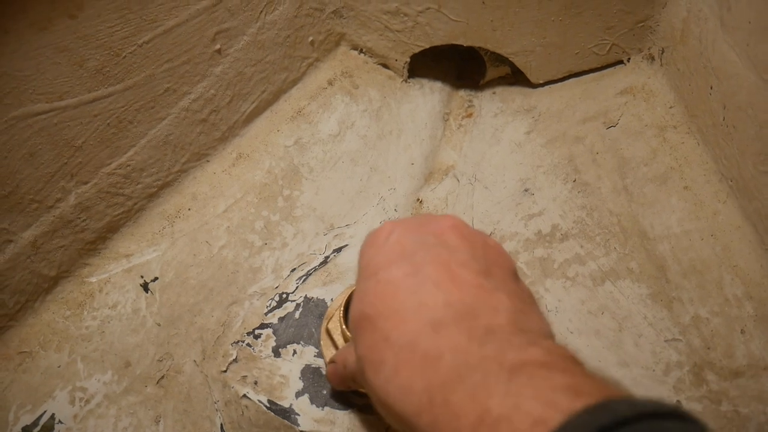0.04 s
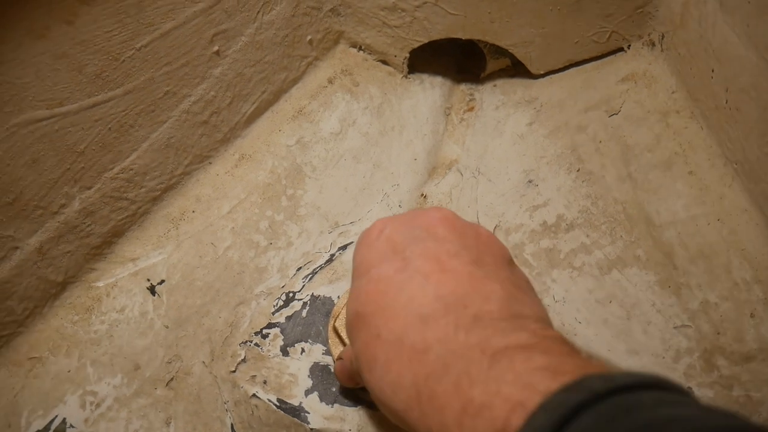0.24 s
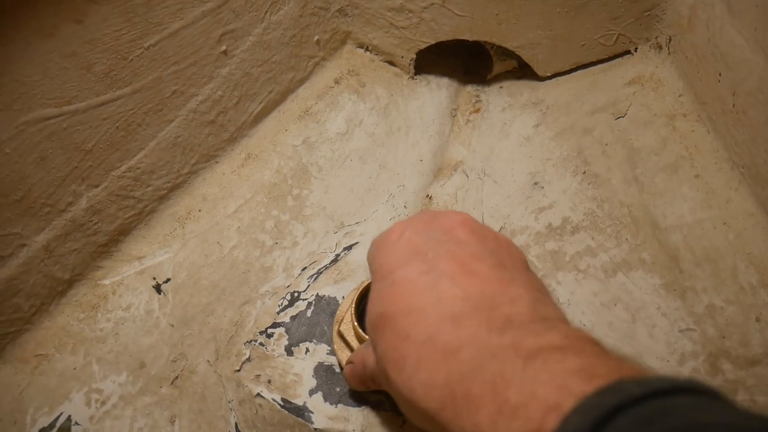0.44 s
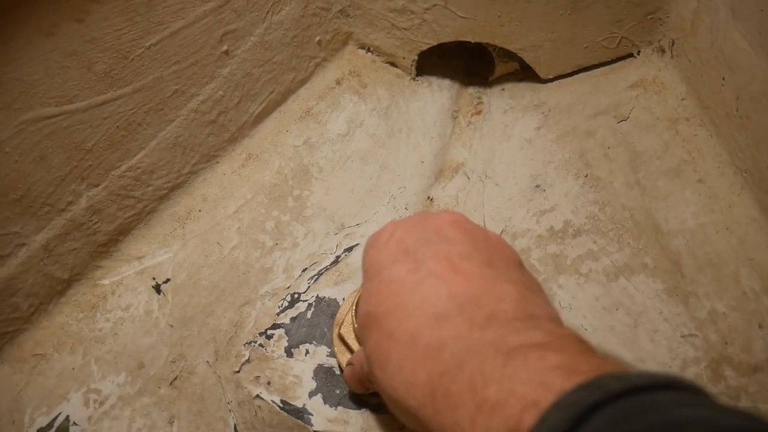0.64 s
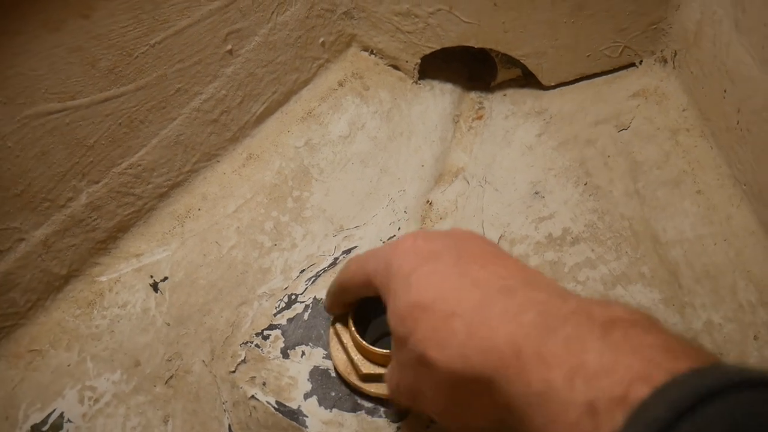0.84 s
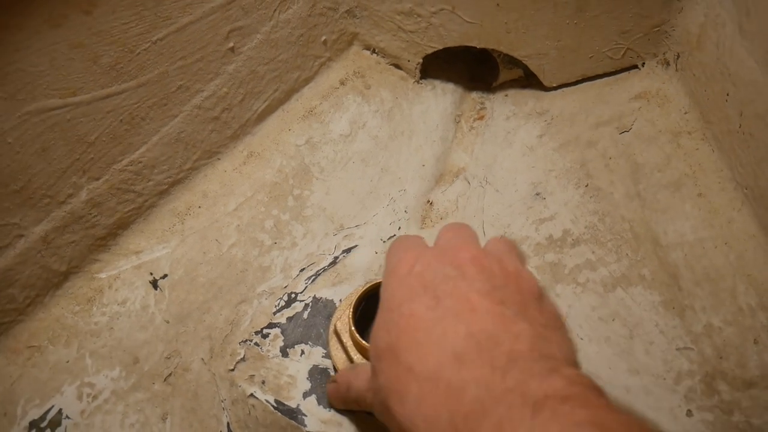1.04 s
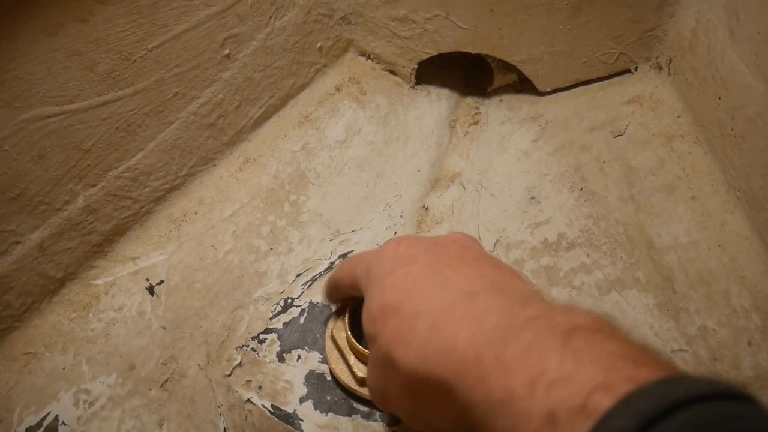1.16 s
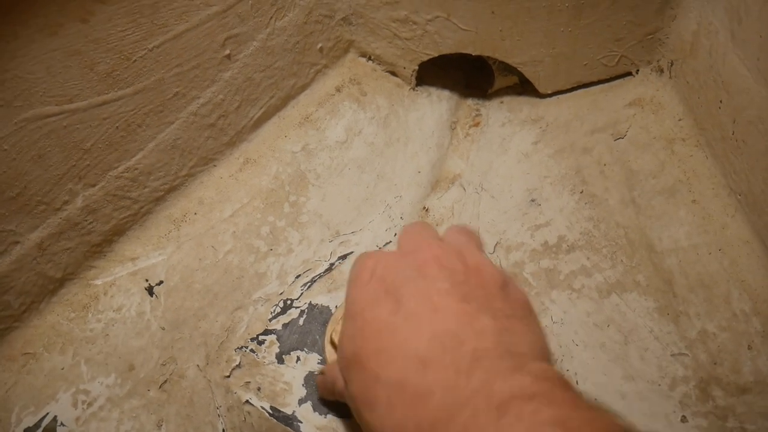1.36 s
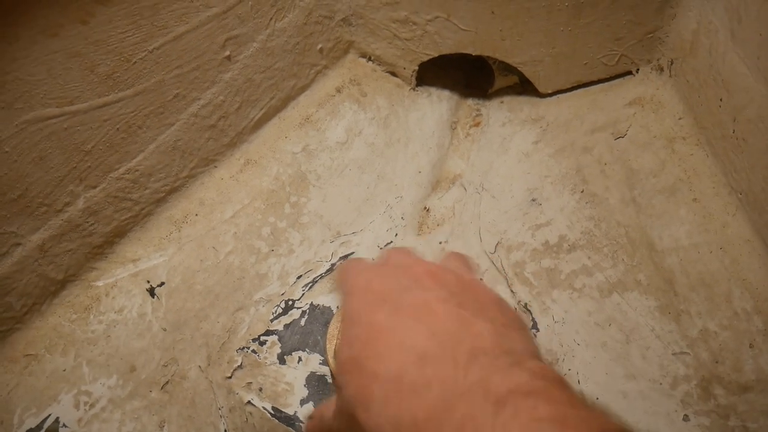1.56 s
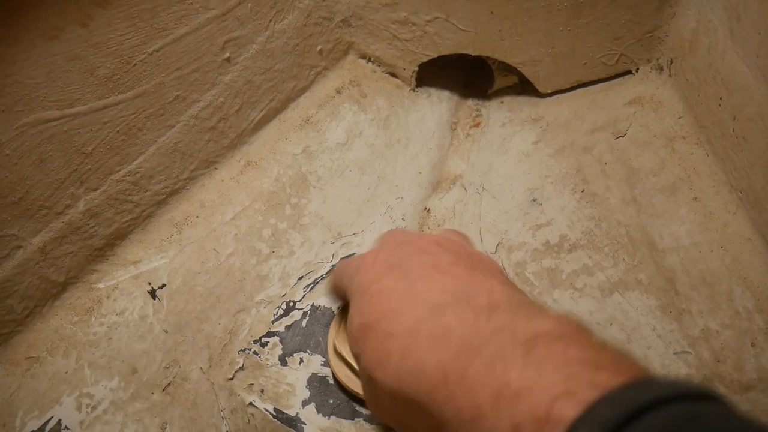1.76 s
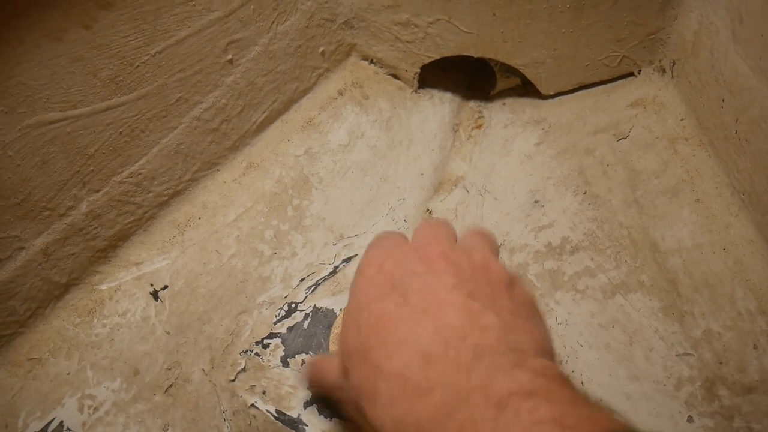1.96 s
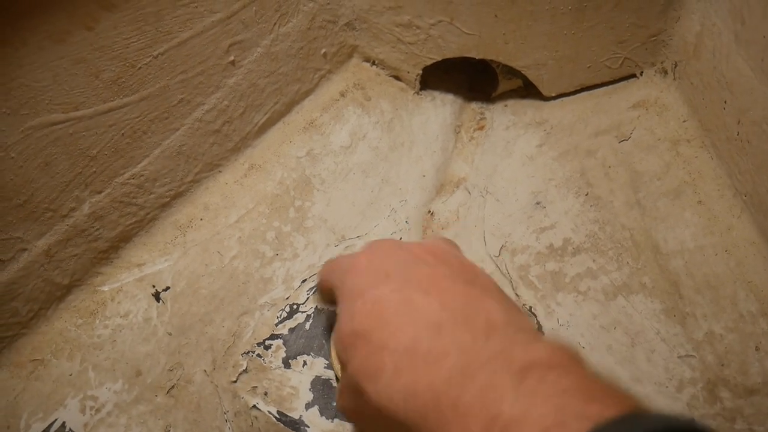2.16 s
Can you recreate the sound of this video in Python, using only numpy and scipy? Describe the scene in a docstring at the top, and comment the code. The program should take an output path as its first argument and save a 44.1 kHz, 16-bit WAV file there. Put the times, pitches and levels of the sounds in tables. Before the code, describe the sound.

A hand turns a tight metal fitting with gritty scrapes and one sharp, booming knock.

```python
"""A hand works a tight metal fitting round in its seat in a fibreglass hull, close to the microphone.
Over the quiet air the hand rubs faintly; then the fitting breaks free with one sharp knock that booms
through the hull, and bumps softly once more. The fingers regrip and turn it in short gritty rubs:
small jerks ring its hollow seat, grit ticks in the thread and the metal squeaks briefly."""
import sys
import numpy as np
from scipy import signal
from scipy.fft import rfft, irfft
from scipy.io import wavfile

SR = 44100
rng = np.random.default_rng(int(sys.argv[2]) if len(sys.argv) > 2 else 0)


def store_wav(level_fs):
    """Save 16-bit WAV to argv[1]."""
    pcm = np.round(np.clip(np.atleast_2d(level_fs), -1, 1) * 32767)
    wavfile.write(sys.argv[1], SR, pcm.T.astype(np.int16))


N = 97020
T = np.arange(N) / SR
HZ = np.fft.rfftfreq(N, 1 / SR)

# booming modes of the hull (frequency [Hz], relative level [dB], t60 [s], build-up [s])
HULL_MODES = [(75.5, -20, 0.49, 0.0052), (88, -21.5, 0.67, 0.0048), (98.6, -24, 0.47, 0.01),
              (114.4, -17, 0.35, 0.0047), (129.6, -13, 0.51, 0.0075), (144.3, -9.5, 0.34, 0.023),
              (242, -18, 0.34, 0.0037), (280, -16.5, 0.36, 0.0028), (345.4, -19.5, 0.39, 0.024),
              (405, -28.5, 0.43, 0.017)]


def amp(db):
    """Decibels to gain."""
    return 10 ** (np.asarray(db) / 20)


def unit(x):
    """Scales to rms 1."""
    return x / np.sqrt(np.mean(x ** 2) + 1e-20)


def read(points, hz):
    """Reads a table on a log-frequency axis."""
    f, value = np.transpose(points)
    return np.interp(np.log(hz + 1), np.log(f + 1), value)


def colour(x, spectrum, lift_db=0):
    """Filters x by a spectrum, at rms 1."""
    return unit(irfft(rfft(x) * amp(read(spectrum, HZ) + lift_db), N))


def noise():
    """White noise."""
    return rng.standard_normal(N)


def since(s):
    """Time since s, zero before."""
    return np.maximum(T - s, 0)


def puff(s, rise_s):
    """Envelope that peaks rise_s after s, then dies away."""
    u = since(s) / rise_s
    return u * np.exp(1 - u)


def bell(s, half_length):
    """Bell-shaped envelope centred on s."""
    return np.exp(-((T - s) / half_length) ** 2)


def ring(s, modes):
    """Damped modes of alternating sign struck at s, each with its own build-up."""
    t = since(s)
    out = np.zeros(N)
    for k, (hz, db, t60, rise) in enumerate(modes):
        envelope = amp(db - 60 * t / t60) * (1 - np.exp(-(t / rise) ** 2))
        out += (-1) ** k * envelope * np.sin(2 * np.pi * hz * t)
    return out


def air():
    """Quiet, steady air inside the hull."""
    # room tone (frequency [Hz], relative level [dB])
    spectrum = [(25, -16), (60, 0.5), (120, 3.5), (250, -1.5), (550, 1), (1000, -12), (2000, -12.5),
                (4000, -20), (8000, -24), (15500, -30)]
    return amp(-54) * colour(noise(), spectrum)


def friction(spectrum, judder_db=0):
    """Dense tiny slips of uneven size, clumped by judder, excite the seat and the metal."""
    # their resonances (frequency [Hz], width [Hz], lift [dB])
    resonances = [(446.4, 5.8, 7), (502, 37, 2), (652.6, 14, 8.5), (809, 24, 4), (1027.4, 31, 9.5),
                  (1480, 9.6, 8.5), (4950, 230, 3), (8200, 140, 4.5), (9720, 140, 5.5)]
    grains_per_s, spread_db, judder_s = 9000, 2, 0.012
    grains = noise() * (rng.random(N) < grains_per_s / SR)
    grains *= amp(spread_db * np.minimum(rng.exponential(1, N), 4))
    judder = unit(irfft(rfft(noise()) * np.exp(-(HZ * judder_s) ** 2), N))
    lift_db = sum(db / (1 + (2 * (HZ - hz) / width) ** 2) for hz, width, db in resonances)
    return colour(grains * amp(judder_db * judder), spectrum, lift_db)


def rubs():
    """Each stroke of the hand drives a juddering low rub, a scrape and a smoother hiss."""
    # the strokes (a table each), the slide into the bump and the firmest turn
    # (time [s], relative rub level [dB], relative scrape level [dB], relative hiss level [dB])
    strokes = [
        [(0.0, -57, -52, -61), (0.01, -49.5, -69, -67), (0.038, -49.5, -59, -75), (0.056, -56, -54.5, -68),
         (0.08, -50, -50.5, -61.5), (0.116, -54, -58, -62), (0.134, -65, -54, -60), (0.164, -75, -63, -62),
         (0.2, -64, -57, -55.5)],
        [(0.75, -80, -64.5, -77), (0.81, -54, -57.5, -63), (0.855, -48.5, -47, -56.5), (0.885, -48, -51, -58.5),
         (0.965, -47.5, -52.5, -58.5), (1.01, -52, -57, -56.5), (1.056, -51.5, -63, -65), (1.11, -57, -66, -67)],
        [(1.42, -71, -63, -72), (1.428, -52, -56.5, -63), (1.455, -53, -49.5, -58.5), (1.49, -43.5, -49, -52.5),
         (1.525, -36.5, -46.5, -54), (1.57, -40.5, -47.5, -54.5), (1.595, -46.5, -53.5, -56.5),
         (1.654, -45.5, -57, -55), (1.7, -51, -58, -60.5)],
        [(1.71, -47.5, -67, -59.5), (1.76, -48, -50, -55.5), (1.828, -48, -53.5, -58), (1.834, -53.5, -46, -57),
         (1.85, -42.5, -45, -60.5), (1.938, -54, -60.5, -60.5), (2.022, -51.5, -60, -61),
         (2.036, -52, -59, -66), (2.06, -55, -68, -69)],
        [(2.07, -64, -58, -68), (2.094, -52, -47.5, -55), (2.112, -42, -45.5, -61), (2.126, -44, -47.5, -49),
         (2.164, -36, -38, -48), (2.18, -39.5, -43.5, -55.5), (2.2, -34, -41, -46)],
    ]
    slide = [(.38, -52, -62.5, -73), (.49, -53.5, -64, -62.5), (.54, -57, -67, -66), (.568, -53, -54, -69),
             (.585, -54.5, -61, -61), (.6, -42.5, -48.5, -50), (.62, -45.5, -52.5, -60.5),
             (.69, -55.5, -72, -83)]
    firm_turn = [(1.125, -50, -68, -62), (1.145, -64, -55, -57.5), (1.165, -46, -43.5, -52.5),
                 (1.207, -32.5, -38, -51), (1.238, -33.5, -44, -57.5), (1.268, -37.5, -51, -62),
                 (1.315, -44.5, -55.5, -62), (1.41, -58.5, -62.5, -64)]
    # the three bands of friction (frequency [Hz], relative level [dB])
    rub_spectrum = [(40, -28), (85, -12.5), (150, -15.5), (230, -9), (330, -3.5), (430, 1), (520, 0.5),
                    (720, -6), (860, -5.5), (1100, -37), (2500, -49), (15000, -78)]
    scrape_spectrum = [(400, -20), (800, 3), (1020, 1.5), (1250, 1), (1550, -3), (1800, -3.5), (2200, -12),
                       (3000, -20), (5000, -25.5), (15000, -56)]
    hiss_spectrum = [(1200, -9.5), (2600, -2.5), (4200, -2.5), (6500, -4), (9500, -11), (12000, -16),
                     (15500, -20)]
    rows = sorted(tuple(row) for stroke in strokes + [slide, firm_turn] for row in stroke)
    times, rub_db, scrape_db, hiss_db = np.transpose(rows)
    rub = amp(np.interp(T, times, rub_db) - 0.5) * friction(rub_spectrum, judder_db=1.1)
    scrape = amp(np.interp(T, times, scrape_db) + 1) * friction(scrape_spectrum, judder_db=0.8)
    hiss = amp(np.interp(T, times, hiss_db) - 0.5) * friction(hiss_spectrum, judder_db=0.5)
    return rub + scrape + hiss


def knock():
    """The fitting breaks free: a crack, the panel's clack, the hull's boom and its echo."""
    # panel round the fitting (frequency [Hz], relative level [dB], t60 [s], build-up [s])
    panel_modes = [(216, -1.5, 0.051, 0.0034), (296, -7.5, 0.1, 0.0082), (330, 3.5, 0.06, 0.0091),
                   (404, -2, 0.046, 0.002), (477, -5, 0.045, 0.0025), (563, -3.5, 0.057, 0.0068),
                   (680, -15.5, 0.12, 0.0089), (802, -6.5, 0.062, 0.0046), (975, -15.5, 0.055, 0.003),
                   (1292, 2, 0.027, 0.0044), (1405, -7.5, 0.029, 0.0048), (1570, -6.5, 0.036, 0.0037),
                   (1730, -17, 0.021, 0.0035), (2124, -12, 0.016, 0.0015), (3060, -19.5, 0.014, 0.00021)]
    # the crack, the panel's crowded upper modes, the swells (frequency [Hz], relative level [dB])
    crack_spectrum = [(300, -21), (1500, -0.5), (2500, -13), (3200, 5), (4000, -7), (6300, -1.5),
                      (7300, -22), (10500, -20.5), (16000, -36)]
    clack_spectrum = [(300, -16), (1000, -9), (1400, 2), (2100, -0.5), (2600, -20), (4000, -20),
                      (8000, -42), (16000, -54)]
    swell_spectrum = [(150, -20), (260, 4.5), (400, 6), (540, -4.5), (800, -19), (1500, -34), (4000, -43),
                      (15000, -76)]
    # the boom swells again as it dies (time [s], level [dB])
    boom_swells = [(0.2819, -23.5), (0.335, -28.5)]
    knock_s = 0.2097
    crack = amp(-25) * colour(noise(), crack_spectrum) * puff(knock_s, rise_s=0.001)
    swell_envelope = sum(amp(db) * puff(s, rise_s=0.0096) for s, db in boom_swells)
    swells = colour(noise(), swell_spectrum) * swell_envelope
    clack = amp(-15.5) * colour(noise(), clack_spectrum) * puff(knock_s, rise_s=0.003)
    boom = amp(-0.5) * (ring(knock_s, panel_modes) + ring(knock_s, HULL_MODES))
    return crack + clack + boom + amp(-17) * echo(knock_s) + swells


def echo(s):
    """Diffuse reflections inside the hull from time s, each band dying at its own speed."""
    # colour of the reflections (frequency [Hz], relative level [dB])
    spectrum = [(40, -25), (80, -4.5), (185, -10.5), (250, -3.5), (430, -5), (600, -18), (850, -13),
                (1100, -27), (1600, -30), (2500, -35.5), (4000, -49), (8000, -68), (16000, -84)]
    # their decay (frequency [Hz], t60 [s])
    decay = [(80, 0.52), (300, 0.5), (700, 0.29), (1500, 0.4), (4000, 0.31), (12000, 0.14)]
    rise_s = 0.0013
    hz, t, bands = signal.stft(colour(noise(), spectrum), SR, nperseg=1024)
    bands *= amp(-60 * np.maximum(t - s, 0) / read(decay, hz)[:, None])
    tail = signal.istft(bands, SR, nperseg=1024)[1][:N]
    return tail * (1 - np.exp(-since(s) / rise_s))


def bump():
    """The fitting bumps softly in its seat, with a faint echo."""
    # modes of the bump (frequency [Hz], level [dB], t60 [s], build-up [s])
    modes = [(197.4, -23, 0.087, 0.0046), (261, -30.5, 0.07, 0.0017), (203.6, -38.5, 0.31, 0.0047),
             (344, -38.5, 0.2, 0.0029), (411, -39.5, .2, .004), (575, -39, .08, .004),
             (860, -33, 0.062, 0.003), (1060, -41.5, 0.084, 0.0018)]
    bump_s = 0.5905
    return ring(bump_s, modes) + amp(-45.5) * echo(bump_s)


def pings():
    """Light touches ring the metal itself."""
    # touches (time [s], level [dB])
    touches = [(.593, -46), (1.832, -44)]
    # modes of the metal (frequency [Hz], relative level [dB], t60 [s], build-up [s])
    metal_modes = [(4870, 0, .055, .003), (6550, -8, .06, .004)]
    return sum(amp(db) * ring(s, metal_modes) for s, db in touches)


def nudges():
    """The weight of the hand sets the hull booming faintly."""
    # pushes on the hull (time [s], gain [dB])
    pushes = [(.594, -34.5), (1.239, -40.5), (1.507, -39.5), (1.978, -44), (2.16, -28.5)]
    return sum(amp(db) * ring(s, HULL_MODES) for s, db in pushes)


def brushes():
    """Skin brushes over the metal as the fingers slide to a new grip."""
    # finger slides (time [s], level [dB], half length [s])
    slides = [(0.599, -58, 0.0074), (0.86, -61, 0.019), (0.994, -58, 0.034), (1.353, -61, 0.017),
              (1.496, -52, 0.014), (1.65, -56, 0.011), (2.128, -49.5, 0.025)]
    # skin on metal (frequency [Hz], relative level [dB])
    spectrum = [(3000, -13), (7000, 4), (10000, -0.5), (13000, -7.5), (15500, -19)]
    return friction(spectrum) * sum(amp(db) * bell(s, half) for s, db, half in slides)


def slips():
    """The tight fitting lets go in small jerks that ring its hollow seat."""
    # jerks of the fitting (time [s], gain [dB])
    jerks = [(0.848, -48), (0.958, -49), (1.203, -38), (1.228, -41), (1.496, -37), (1.523, -38),
             (1.558, -40), (1.738, -48)]
    # modes of the seat (frequency [Hz], relative level [dB], t60 [s], build-up [s])
    seat_modes = [(419, -6, 0.2, .002), (467, -12, 0.15, 0.0018), (519, -0.5, 0.16, .002),
                  (651, -0.5, 0.21, .002), (780, -12, 0.14, .002), (1030, -15, 0.12, .002)]
    return sum(amp(db) * ring(s, seat_modes) for s, db in jerks)


def ticks():
    """Grit catches in the thread with short bright ticks."""
    # catches of grit (time [s], level [dB], rise [s])
    catches = [(1.129, -61, 0.0036), (1.284, -51, 0.0058), (1.332, -58, 0.01), (1.49, -53, 0.0032),
               (1.633, -49, 0.0045), (1.714, -51.5, 0.0043), (1.832, -51.5, 0.0053)]
    # colour of a tick (frequency [Hz], relative level [dB])
    spectrum = [(300, -4), (1500, 8.5), (3000, -8), (4900, -1), (9000, -9.5), (15000, -16)]
    return friction(spectrum) * sum(amp(db) * puff(s, rise) for s, db, rise in catches)


def squeaks():
    """Friction briefly locks onto one resonance, which may slide as the grip moves."""
    # metal squeaking on its seat
    # (time [s], pitch [Hz], level [dB], half length [s], half width [share of pitch], glide [Hz/s])
    events = [(1.176, 1460, -48, 0.026, 0.1, 0), (1.212, 9650, -58.5, 0.016, .026, 5000),
              (1.39, 8250, -66, .016, 0.018, 0), (1.65, 1760, -56.5, 0.1, 0.12, 0),
              (1.585, 3900, -61, 0.035, .11, 9000), (1.66, 4200, -60.5, 0.04, .12, -8000),
              (1.79, 6720, -66, 0.055, .03, 0)]
    out = np.zeros(N)
    for s, hz, db, half, width, glide in events:
        band = irfft(rfft(noise()) / (1 + ((HZ / hz - 1) / width) ** 4), N)
        gliding = signal.hilbert(band) * np.exp(1j * np.pi * glide * (T - s) ** 2)
        out += amp(db) * bell(s, half) * unit(gliding.real)
    return out


def scene():
    """The hand and the fitting close up, over the air in the hull, in mono."""
    handling = rubs() + pings() + nudges() + slips() + ticks() + squeaks() + brushes()
    return (handling + knock() + bump() + air())[None]


def record(dry):
    """The knock softly overloads the close microphone; a low-pass cuts the highest treble."""
    knee, cutoff_hz = 2.4, 15800
    soft = dry / (1 + abs(dry) ** knee) ** (1 / knee)
    low_pass = signal.firwin(511, cutoff_hz, window=("kaiser", 9), fs=SR)
    return signal.oaconvolve(soft, low_pass[None], "same")


dry = scene()
out = record(dry)
store_wav(out)
```